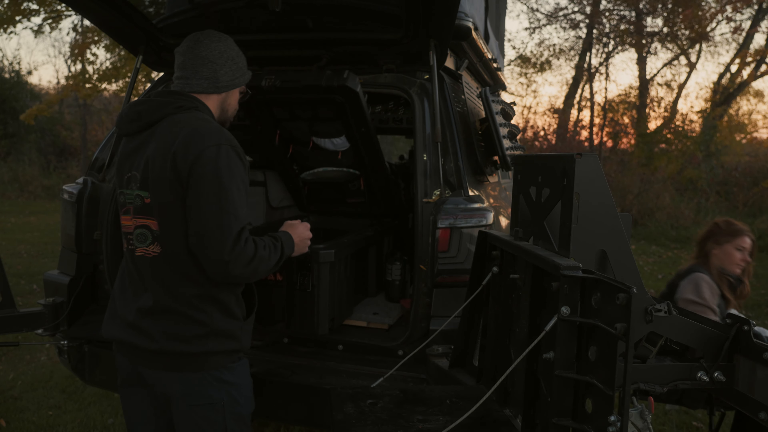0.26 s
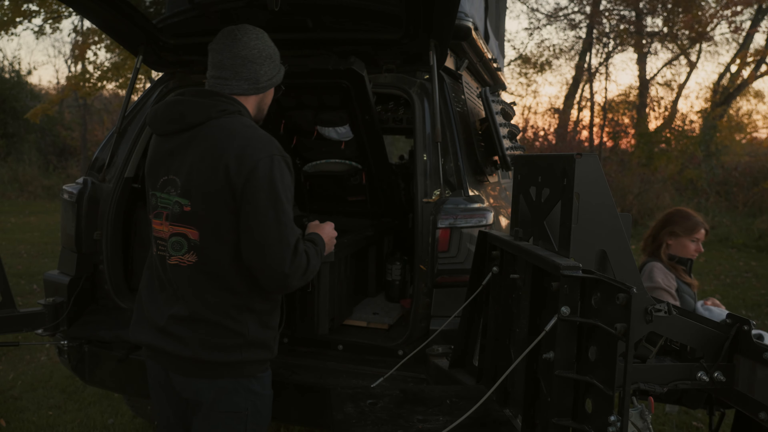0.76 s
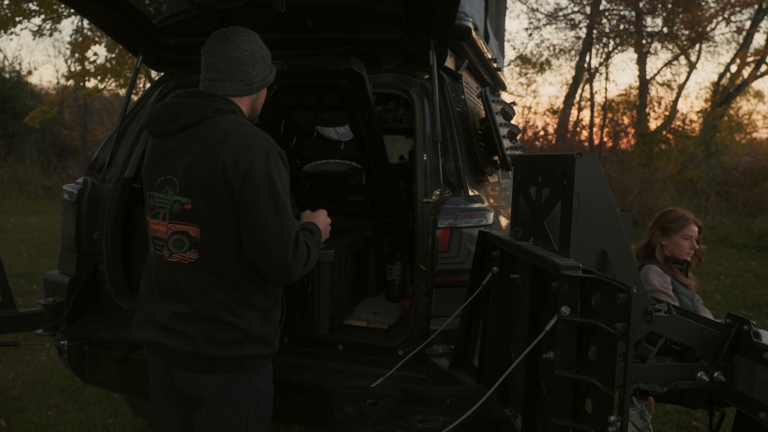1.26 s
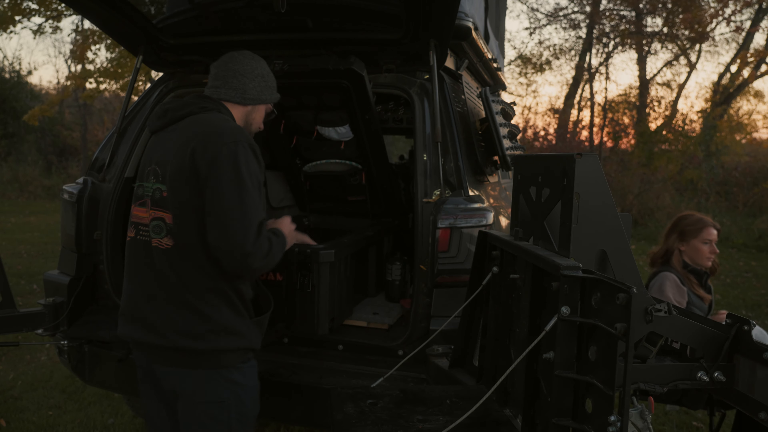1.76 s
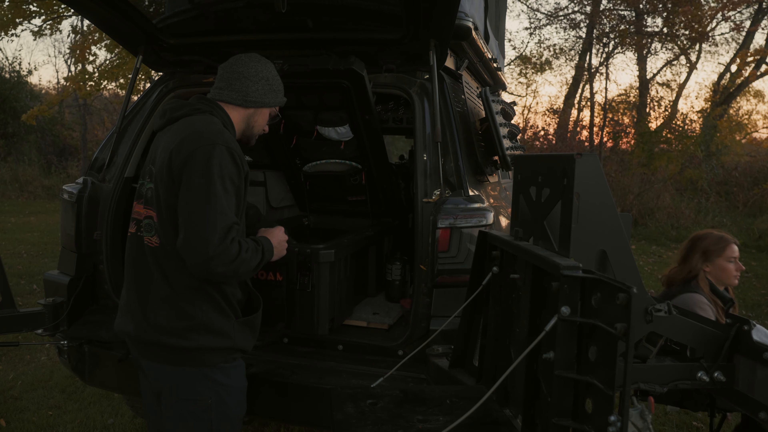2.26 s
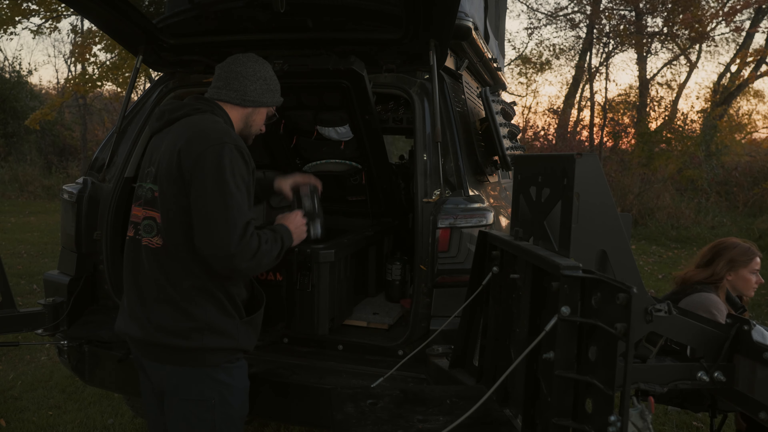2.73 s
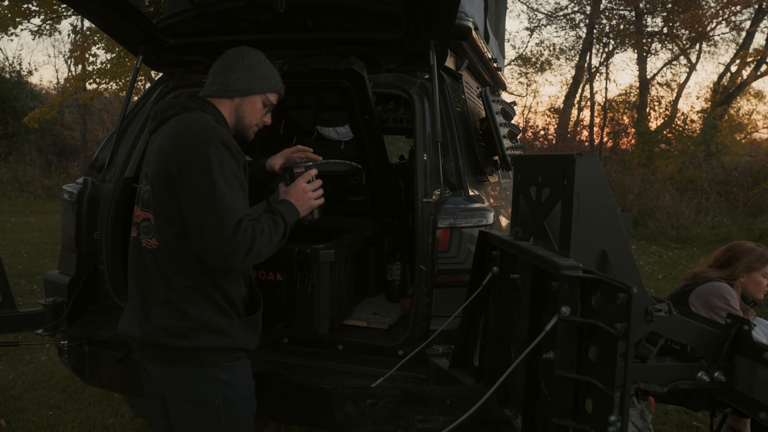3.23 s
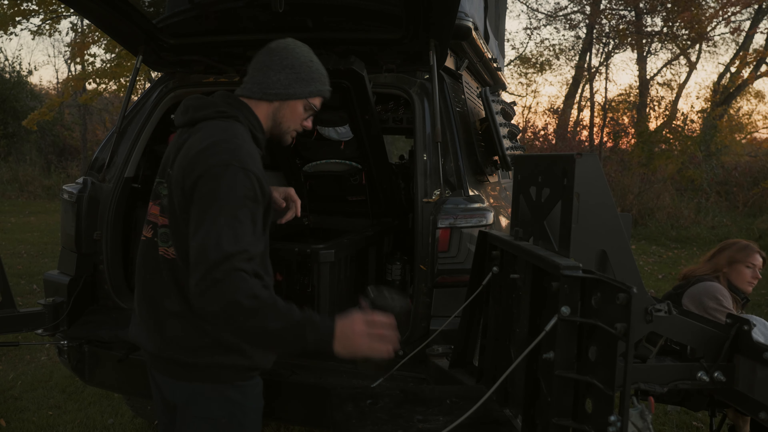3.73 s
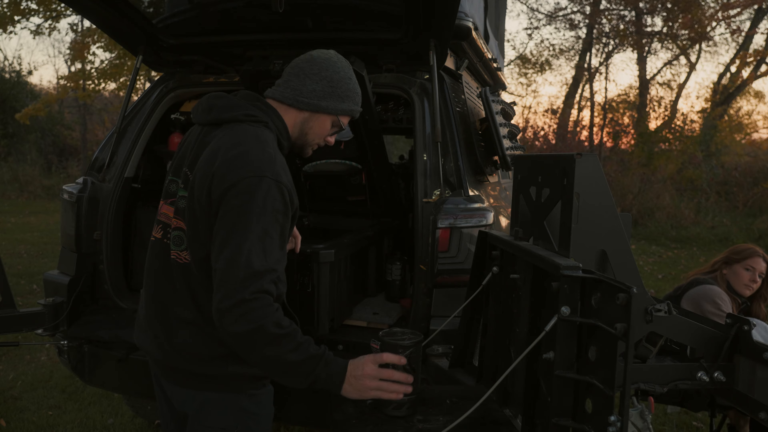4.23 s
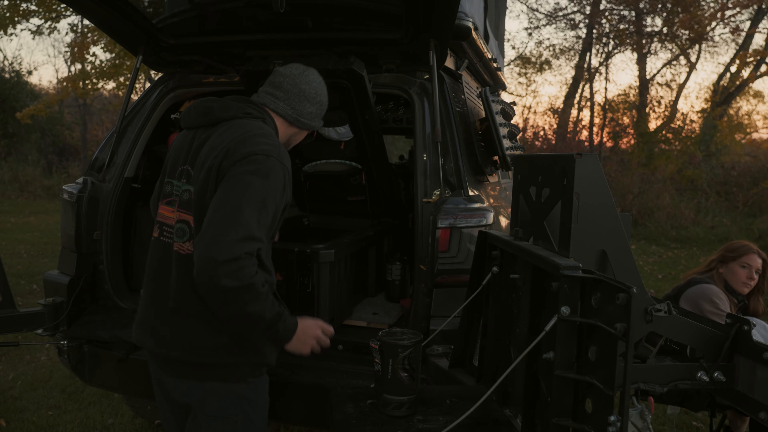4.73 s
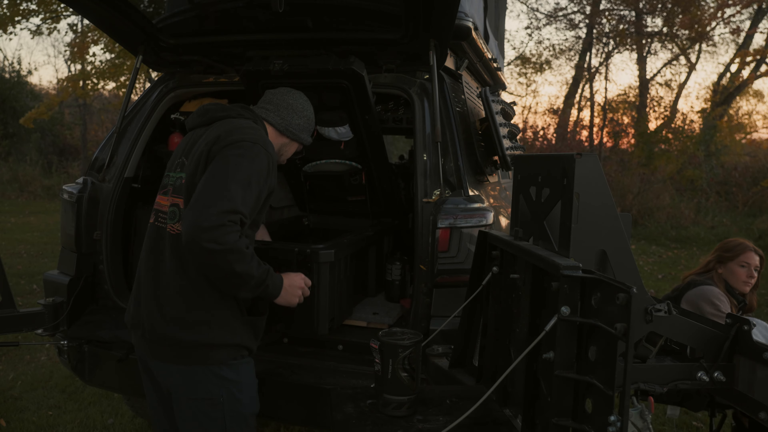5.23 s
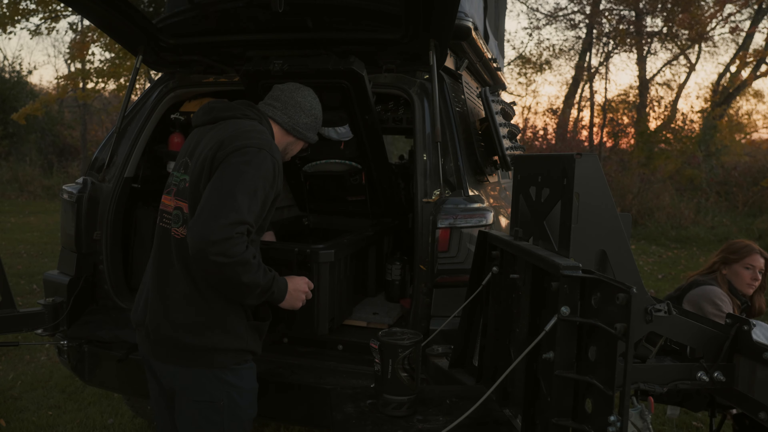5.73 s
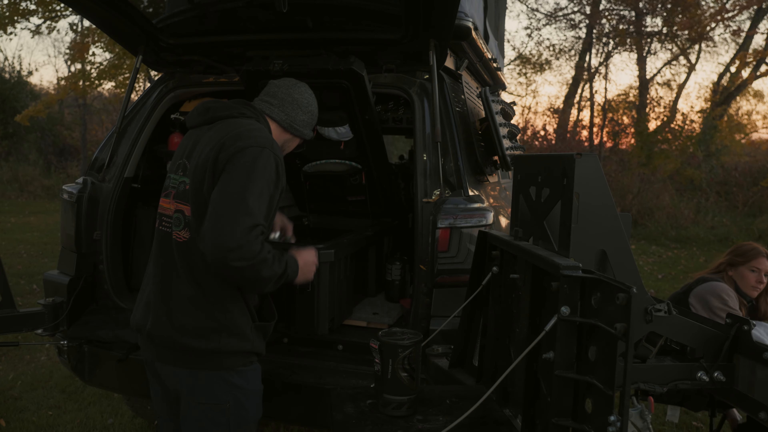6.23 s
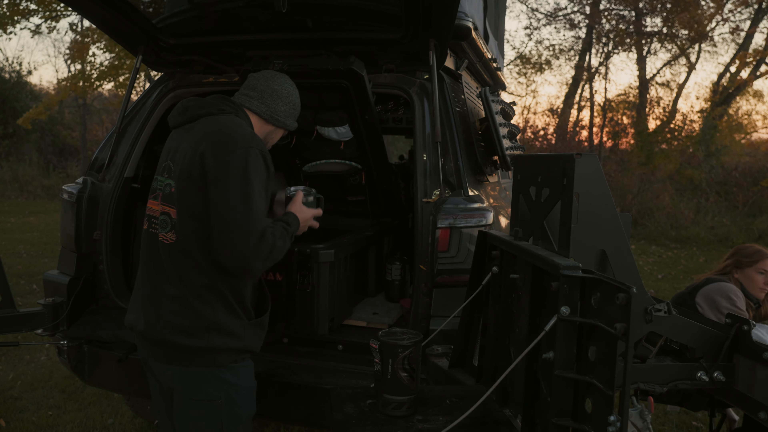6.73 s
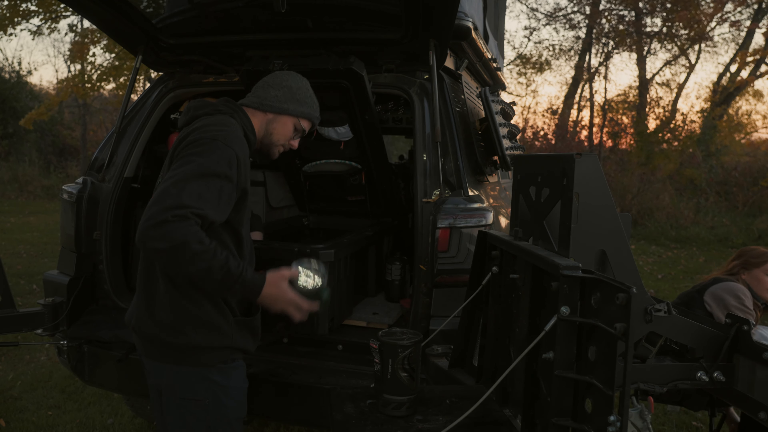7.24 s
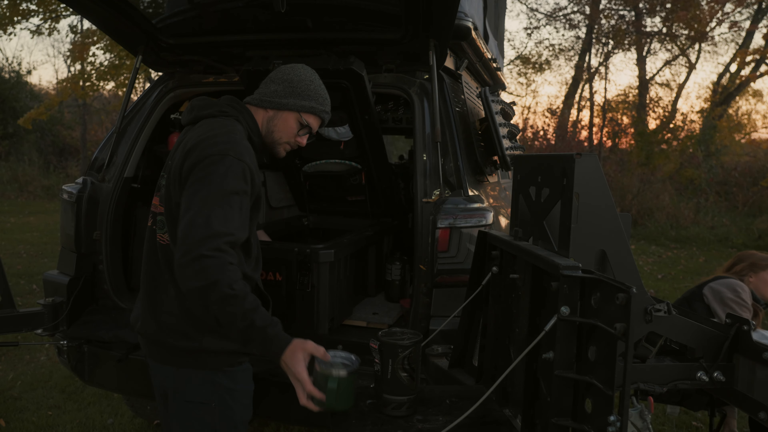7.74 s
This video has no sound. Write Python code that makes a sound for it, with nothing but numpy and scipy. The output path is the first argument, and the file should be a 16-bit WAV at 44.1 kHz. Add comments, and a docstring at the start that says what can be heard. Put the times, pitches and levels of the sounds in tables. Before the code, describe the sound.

Camp cookware knocks and clacks in a plastic bin, a lid clicks onto a pot, the pot lands on a tailgate, then a canister taps.

```python
"""Camp cookware knocks in a plastic bin at the back of a truck: struck walls flex, panels clack, items crack.
Lids and utensils click as a lid snaps on a pot; the pot rings as it is set down on the tailgate.
A fuel canister is stroked and tapped; sleeves and gear rub as shaped noise, and stick-slip tones squeak.
Impacts are sums of decaying modes and noise bursts. Short dull reflections follow all the gear,
over an open-air hush of noise and a faint steady hum of slightly wavering sines."""
import sys
import numpy as np
from scipy import signal
from scipy.fft import rfft, irfft, next_fast_len
from scipy.io import wavfile
from scipy.ndimage import uniform_filter1d

SR = 44100
rng = np.random.default_rng(int(sys.argv[2]) if len(sys.argv) > 2 else 0)


def wav_record(signal):
    """Record a signal, one row per channel, as 16-bit PCM in the file named by sys.argv[1]."""
    frames = np.transpose(np.atleast_2d(signal))
    bounded = np.clip(frames, -1, 1)
    # unit amplitude maps onto the largest positive 16-bit level
    quanta = np.round(bounded * 32767).astype(np.int16)
    wavfile.write(sys.argv[1], SR, quanta)


N = 352359   # length of the scene in samples
HIT_SIZE = SR // 2   # a blow is computed for half a second
AGE = np.arange(HIT_SIZE) / SR   # time since the blow began, s


# Gear knocking in the bin; bin_knocks() offsets each level column:
# [t/s, thump level/dB, thump f/Hz, clack level/dB, crack level/dB]
KNOCKS = [(0.24, -54, 103, -50, -50), (0.589, -41, 138, -66, -61), (0.624, -41, 87.5, -55, -47),
          (0.851, -26, 218, -33, -36), (0.87, -26.5, 95, -70, -56), (1.895, -41, 102, -60, -66),
          (1.931, -31, 137, -43, -62), (1.982, -31, 123, -39, -56), (2.004, -52, 99, -54, -40.5),
          (2.123, -35, 159, -22, -35.5), (2.131, -21.5, 145.4, -35.5, -41), (2.14, -27, 313, -25.5, -36.5),
          (2.155, -24, 142, -53, -63), (2.29, -44, 110, -43.5, -44), (2.302, -28, 88, -51, -70),
          (2.345, -17.5, 140, -30.5, -38), (2.459, -46, 108, -39, -49), (2.496, -26, 150, -40, -51),
          (2.521, -57, 164, -43.5, -42), (2.681, -40.5, 100, -49, -50), (2.741, -41, 214, -53, -56),
          (5.434, -40.5, 128, -61, -53), (5.839, -32.5, 121, -74, -74), (5.898, -29.5, 131, -66, -54),
          (6.09, -15, 180, -19.5, -31.5), (6.104, -16.5, 203, -47, -37), (6.14, -23.5, 103, -37, -47),
          (6.424, -37, 130, -65, -58), (6.437, -38, 115, -40.5, -56.5), (6.656, -39, 231, -59, -70),
          (6.742, -38.5, 264, -64, -69), (7.023, -33, 182, -36.5, -42), (7.041, -36.5, 246, -38, -54),
          (7.164, -35, 130, -52, -68), (7.188, -40.5, 91, -61, -50.5), (7.95, -49, 105, -37, -47.5),
          (7.959, -30.5, 97, -41, -50)]
# Modes of the bin panels, levels relative: [f/Hz, level/dB, t60/s]
BIN_MODES = [(277.6, 2, 0.15), (360.7, 1, 0.2), (399, 0.5, 0.17), (445, -2, 0.1), (516.6, 4, 0.1),
             (565, -1, 0.12), (647, 7, 0.065), (736, 1, 0.074), (813, -5, 0.12), (903, -13.5, 0.093),
             (1021, -7.5, 0.037), (1125, -9, 0.065), (1231, -13, 0.036), (1430, -18.5, 0.03)]
# Boom resonances of the hollow bin: [f/Hz, width/Hz, level/dB]
HOLLOW = [(77.8, 12, -1), (124, 14, -4.5), (154.7, 7.1, -12), (214.4, 37, -4)]
# Spectrum of a cracking item, relative: [f/Hz, level/dB per Hz]
CRACK = [(300, 11), (700, 3.5), (1200, 4.5), (1700, 0.5), (2600, -3), (3800, -8.5), (6000, -23.5),
         (10000, -32), (16000, -36)]
ITEM_HZ, ITEM_SPREAD = 1130, 0.16   # centre pitch of the items; spread in octaves


def bin_knocks(thump_db=-6.0, clack_db=-3.0, crack_db=-0.5, flex_t60=0.058, rise_s=0.004,
               upper_ratio=1.593, upper_db=-10.0, item_db=4.0):
    """Modal impact: the wall flexes and excites the hollow, panels clack and the item cracks at its own pitch."""
    thumps, rest = np.zeros((2, N))
    for s, low_db, hz, mid_db, high_db in KNOCKS:
        phase = 2 * np.pi * hz * AGE
        two_modes = np.sin(phase) + from_db(upper_db) * np.sin(upper_ratio * phase)
        flex = two_modes * fade(flex_t60) * (1 - np.exp(-AGE / rise_s))
        add(thumps, s, at_level(flex, low_db + thump_db))

        # a soft contact leaves the upper panel modes quiet
        hardness_db = 0.46 * (high_db - mid_db + 12.0)
        clack = ring(BIN_MODES, scatter_db=4.5, detune=0.016, tilt_db=hardness_db)
        add(rest, s, at_level(clack, mid_db + clack_db))

        crack = burst(CRACK, t60=0.055, tail_db=-12, tail_t60=0.1, ripple_db=3.0)
        item_hz = ITEM_HZ * 2 ** (ITEM_SPREAD * rng.standard_normal())
        item = resonance(crack, item_hz, 180)
        add(rest, s, at_level(crack + from_db(item_db) * item, high_db + crack_db))
    boom = sum(from_db(db) * resonance(thumps, hz, width) for hz, width, db in HOLLOW)
    return thumps + rest + boom


# A loose metal item set ringing inside the bin: [t/s, level/dB, f/Hz]
CLINKS = [(0.626, -55, 1780), (0.852, -40.5, 1238), (2.141, -34, 920), (5.435, -60, 1127),
          (6.092, -28.5, 1115)]


def clinks(t60=0.043, twin_ratio=1.09, twin_db=-8.0):
    """Damped close modes: a metal item rings at two near pitches, soon damped by the gear around it."""
    out = np.zeros(N)
    for s, db, hz in CLINKS:
        modes = [(hz, 0, t60), (hz * twin_ratio, twin_db, t60 / 2)]
        add(out, s, at_level(ring(modes), db))
    return out


# Small hard contacts of lids and utensils; utensil_clicks() offsets both level columns:
# [t/s, click level/dB, edge level/dB, ring f/Hz]
CLICKS = [(2.038, -44, -74, 3330), (2.1042, -30, -77, 3250), (2.1318, -25.5, -39, 2040),
          (2.167, -36, -57, 3770), (2.175, -29, -34, 3250), (2.1998, -40, -64, 3150),
          (2.476, -29.5, -62, 3230), (2.5428, -36.5, -54, 3100), (2.5585, -30, -56, 3280),
          (2.6123, -37.5, -70, 2890), (2.6444, -31, -55, 2950), (2.9798, -46, -78, 1900),
          (3.0772, -44, -62, 2920), (3.129, -42, -42, 4100), (3.1394, -30.5, -28, 3460),
          (3.1522, -37.5, -45, 3200), (3.2909, -53, -53, 3940), (3.5936, -45, -58, 2720),
          (3.628, -41, -59, 2620), (4.045, -29, -56, 2260), (4.074, -29.5, -52, 4200),
          (4.123, -41, -65, 2320), (4.1418, -39.5, -51, 3460), (4.1583, -34.5, -47, 4460),
          (4.1718, -39, -48, 3520), (4.4047, -46.5, -51, 2330), (7.023, -37, -58, 1750),
          (7.0472, -42, -70, 2120), (7.1524, -43, -71, 4150), (7.4909, -44, -62, 2650),
          (7.7127, -31, -27, 4260)]
# Spectrum of a click, also used for canister ticks, relative: [f/Hz, level/dB per Hz]
CLICK = [(150, -12), (500, 12.5), (1400, -1), (2200, -2.5), (3200, -2), (4500, -1), (6500, -7.5),
         (9000, -14), (16000, -35)]
# Spectrum of a bright edge, also used for fine hiss, relative: [f/Hz, level/dB per Hz]
EDGE = [(2000, -40), (5000, -4), (7500, -2.5), (10000, -2.5), (13000, -4), (16000, -0.5)]


def utensil_clicks(click_db=-9.0, edge_db=-7.0, ring_db=7.0, ring_width_hz=340.0,
                   low_cut_hz=1260.0, octaves_per_db=0.09):
    """Contact hardness: light parts click and ring with a bright edge; the harder the edge, the thinner the click."""
    out = np.zeros(N)
    for s, body_db, top_db, hz in CLICKS:
        cut_hz = np.clip(low_cut_hz * 2 ** (octaves_per_db * (top_db - body_db)), 100, 3000)
        high_pass = signal.butter(2, cut_hz, "high", fs=SR, output="sos")
        click = signal.sosfilt(high_pass, burst(CLICK, t60=0.046, tail_db=-8.5, tail_t60=0.053))
        ringing = from_db(ring_db) * resonance(click, hz, ring_width_hz)
        add(out, s, at_level(click + ringing, body_db + click_db))
        edge = burst(EDGE, t60=0.03, tail_db=-24, tail_t60=0.086)
        add(out, s, at_level(edge, top_db + edge_db))
    return out


# The pot landing and rocking on the tailgate: [t/s, level/dB]
SET_DOWN = [(4.047, -27), (4.076, -42.5), (4.122, -49.5), (4.271, -50.5)]
# Modes of the pot and the tailgate under it, levels relative: [f/Hz, level/dB, t60/s]
POT_MODES = [(80, -9, 0.83), (158, -9, 0.77), (212.4, -5, 0.48), (238.4, -2, 0.39), (271.4, -3, 0.41),
             (310, -6.5, 0.56), (359, 7, 0.23), (390.5, 1.5, 0.21), (460, -12, 0.49), (785, -4.5, 0.16),
             (846, -7, 0.79), (892, -2, 0.078), (1238, -22, 0.82), (1570, -22.5, 0.92), (1730, -1, 0.032),
             (2280, -15.5, 0.42), (2331, -19, 0.29), (3230, -19, 0.33), (4230, -22, .25)]
# Spectrum of the tailgate thud, relative: [f/Hz, level/dB per Hz]
TAILGATE = [(50, -25), (120, -10), (300, -5), (500, -4.5), (700, -16), (1100, -26), (2500, -16.5),
            (8000, -38.5)]


def pot(thud_db=-4.5):
    """Coupled modes: the pot lands on its rim and rocks flat, ringing over the thud of the tailgate."""
    out, note = np.zeros(N), ring(POT_MODES)
    for s, db in SET_DOWN:
        thud = burst(TAILGATE, t60=0.06, tail_db=-13, tail_t60=0.33, ripple_db=2.0)
        add(out, s, at_level(note, db) + at_level(thud, db + thud_db))
    return out


# Taps on the canister: [t/s, level/dB]
TAPS = [(7.492, -52), (7.713, -33.5)]
# Modes of the hand-held canister, levels relative: [f/Hz, level/dB, t60/s]
CANISTER_MODES = [(410, 2, 0.087), (624, -9, 0.11), (1076, 6.5, 0.034), (1214, 4, 0.2), (1660, -1.5, 0.042),
                  (3030, -4, 0.052), (3540, 9, 0.02), (3800, -3, 0.033), (4300, 9.5, 0.019),
                  (5500, -23, 0.29), (7660, -19, 0.25), (9500, -6, 0.019), (10400, -8, .04),
                  (11000, 4, 0.016)]


def canister(tick_db=-19.0):
    """Damping by the hand: most of the tapped modes die at once and a few ring on, under a sharp metal tick."""
    out, note = np.zeros(N), ring(CANISTER_MODES)
    for s, db in TAPS:
        add(out, s, at_level(note, db))
        tick = burst(CLICK, t60=0.03, tail_db=-23, tail_t60=0.076)
        add(out, s, at_level(tick, db + tick_db))
    return out


# Fingers stroking the canister: [t/s at the fastest, speeding up/s, slowing down/s, level/dB]
STROKES = [(5.69, .03, 0.038, -62), (5.82, .05, 0.042, -54.5), (6.05, 0.09, 0.11, -63),
           (6.75, .1, .06, -67), (7.125, .025, 0.054, -66.5), (7.25, 0.026, 0.21, -58.5),
           (7.335, 0.1, 0.27, -64.5), (7.57, 0.078, 0.05, -64)]
# Resonances of the rubbed canister shell, levels relative: [f/Hz, width/Hz, level/dB]
SHELL = [(1170, 89, -0.5), (2560, 90, -3), (3440, 70, -6), (4380, 260, 1.5), (7130, 170, -2),
         (8670, 320, 0.5), (10760, 220, -1), (11600, 520, -1), (13300, 900, -1), (15300, 1300, -2)]


def grip(grain_db=-1.5, flutter_db=4.5, skin_db=-27.0):
    """Friction excitation: skin drags over the canister in tiny slips that set its thin shell hissing."""
    pressure, = strokes(STROKES)
    unevenness_db = grain_db * drift(980) + flutter_db * drift(80)
    slips = rng.standard_normal(N) * from_db(unevenness_db)
    shell = sum(from_db(db) * resonance(slips, hz, width) for hz, width, db in SHELL)
    skin = from_db(skin_db) * np.diff(slips, prepend=0)
    return pressure * rms_one(shell + skin)


# Smooth surfaces sticking and slipping; the glide is a share of the pitch each side of the middle:
# [t/s at the middle, half-length/s, f/Hz, level/dB, glide]
SQUEAKS = [(0.231, 0.031, 12580, -37.5, -0.0021), (0.256, 0.05, 8300, -57, -0.061),
           (0.249, 0.034, 4320, -58.5, -0.034), (0.875, 0.011, 4850, -54, -0.047),
           (0.95, 0.016, 5100, -61.5, 0.0), (2.178, 0.039, 10800, -57, -0.021),
           (3.653, 0.041, 10940, -63, 0.0), (4.41, 0.036, 2273, -60, 0.014),
           (5.701, 0.094, 3520, -61.5, 0.022), (5.994, .02, 1630, -60, 0.014),
           (6.038, 0.054, 1113, -58, 0.0062), (6.659, 0.044, 832, -60.5, -0.03),
           (6.675, 0.079, 3740, -58, -0.017), (7.245, 0.045, 4320, -63, -0.0046)]


def squeaks(waver_hz=75.0, catch_db=2.5):
    """Stick-slip oscillation: brief tones swell and die, with an unsteady pitch and a catching level."""
    out = np.zeros(N)
    for s, half_length, hz, db, glide in SQUEAKS:
        along = AGE / half_length - 1   # -1 at the start, 0 at the middle
        waver = waver_hz * np.sqrt(hz / 4000) * drift(557, size=HIT_SIZE)   # waver_hz holds at 4 kHz
        pitch = hz * (1 + glide * np.clip(along, -1, 1)) + waver
        swell = np.exp(-8 * along ** 2) * from_db(catch_db * drift(303, size=HIT_SIZE))
        tone = np.sqrt(2) * np.sin(2 * np.pi * np.cumsum(pitch) / SR)
        add(out, s - half_length, from_db(db) * swell * tone)
    return out


# Sleeves and gear sliding, one row a stroke:
# [t/s at the fastest, speeding up/s, slowing down/s, rubbing level/dB, fine hiss level/dB]
SLIDES = [(.27, 0.046, .045, -62, -58.5), (1.93, 0.068, 0.27, -62, -68), (2.13, 0.074, 0.04, -52, -79),
          (2.51, 0.36, 0.32, -61.5, -61.5), (2.88, 0.13, .025, -79, -66), (3.065, 0.031, 0.06, -61, -57),
          (3.12, .05, .06, -66.5, -52), (3.3, .09, .035, -68, -62), (4.45, 0.19, .03, -70, -65),
          (5.5, 0.29, 0.18, -63, -66.5), (5.685, 0.017, 0.033, -61.5, -54.5), (5.82, .05, 0.043, -64, -56),
          (5.89, 0.11, 0.14, -58.5, -64), (6.66, 0.05, 0.036, -64.5, -59),
          (6.745, 0.055, 0.041, -67.5, -64), (7.45, 0.36, 0.44, -69, -68)]
# Heavy gear shifting on the bin floor:
# [t/s at the fastest, speeding up/s, slowing down/s, rumble level/dB]
DRAGS = [(2.17, 0.098, 0.057, -35.5), (2.54, .1, 0.23, -51), (5.48, 0.073, 0.21, -50),
         (5.9, 0.51, 0.2, -52), (6.11, .02, 0.1, -36.5), (6.8, 0.62, 0.54, -60), (7.15, 0.24, 0.19, -52)]
# Spectrum of rubbing, relative: [f/Hz, level/dB per Hz]
RUBBING = [(150, -28), (600, 6), (1800, -4), (4000, 0), (7000, -13), (16000, -40)]
# Spectrum of the bin's rumble, relative: [f/Hz, level/dB per Hz]
RUMBLE = [(25, -32), (60, -3), (110, 3.5), (170, -1.5), (260, -2.5), (450, -20.5), (1000, -46), (3000, -50)]


def handling(grain_db=2.5, flutter_db=2.0):
    """Friction noise: sliding surfaces catch in tiny uneven grains; heavy gear makes the bin rumble."""
    rub_gain, hiss_gain = strokes(SLIDES)
    drag_gain, = strokes(DRAGS)
    unevenness_db = grain_db * drift(1500) + flutter_db * drift(70)
    grains = rng.standard_normal((2, N)) * from_db(unevenness_db)
    rubbing = rub_gain * colour(grains[0], RUBBING)
    hiss = hiss_gain * colour(grains[1], EDGE)
    rumble = np.hypot(drag_gain, settling()) * noise(RUMBLE)   # the two powers add
    return rubbing + hiss + rattles(rub_gain) + rumble


def rattles(rub_gain, above_db=0.0, spread_db=3.0, count=380):
    """Random micro-impacts: sliding gear catches in ticks of chance time and pitch that follow the rubbing level."""
    out, decay = np.zeros(N), fade(0.04)[:HIT_SIZE // 10]
    for when, pitch, strength in rng.random((count, 3)):
        tick_hz = 900 * 11 ** pitch
        tick = resonance(rng.standard_normal(len(decay)) * decay, tick_hz, 550)
        tick_db = above_db + spread_db * (2 * strength - 1)
        add(out, when * N / SR, rub_gain[int(when * N)] * at_level(tick, tick_db))
    return out


SETTLE_DB, SETTLE_T60_S = -21, 0.35   # rumble relative to the tabled thump level; its decay


def settling():
    """Energy decay: every knock shakes the load, which soon comes to rest; a gain curve from summed powers."""
    power = np.zeros(N)
    for s, thump_db, *_ in KNOCKS:
        gain = from_db(thump_db + SETTLE_DB) * fade(SETTLE_T60_S)
        add(power, s, gain ** 2)
    return np.sqrt(power)


STROKE_END_DB, STROKE_ROUNDNESS = -15.5, 1.6   # level at both ends; 1 is a pointed swell, 2 a round one


def strokes(rows):
    """Speed-dependent friction: strokes swell as the hand speeds up and die as it slows; a gain per level column."""
    t, power = np.arange(0, N, 20) / SR, 0
    for s, rise, fall, *levels in rows:
        away = np.maximum((s - t) / rise, (t - s) / fall)   # 0 at the fastest, 1 at either end
        shape_db = STROKE_END_DB * np.minimum(away, 10) ** STROKE_ROUNDNESS
        power = power + from_db(np.array(levels)[:, None] + shape_db) ** 2
    return [np.interp(np.arange(N) / SR, t, np.sqrt(p)) for p in power]


def cargo_bay(x, wet_db=-16.5, t60=0.15, delay_s=0.014):
    """Diffuse reflection: decaying noise, convolved in, gives short dull echoes of the open back of the truck."""
    walls = [(40, 6.5), (300, -4.0), (1200, -1), (4000, -6.5), (16000, -13)]   # f/Hz, level/dB per Hz
    onset = np.clip(AGE / delay_s - 1, 0, 1)   # silent until delay_s, full at twice that
    echoes = noise(walls, size=HIT_SIZE) * fade(t60) * onset
    in_band = np.abs(rfft(echoes))[:HIT_SIZE // 20]   # unit mean power gain below 2.2 kHz
    unit_echoes = echoes / np.sqrt(np.mean(in_band ** 2))
    return from_db(wet_db) * signal.fftconvolve(x, unit_echoes)[:N]


# Components of the hum: [f/Hz, level/dB]
HUM = [(102.3, -71.5), (133, -82), (183, -72.5), (233, -62.5), (354, -73.5), (466, -77), (540, -75),
       (1163, -82)]
# Spectrum of the open air, relative: [f/Hz, level/dB per Hz]
AIR = [(20, -1.5), (60, 0.5), (100, 2.5), (200, -2), (360, -4.5), (520, -9.5), (780, -13.5), (1150, -13.5),
       (1600, -19.5), (4500, -19.5), (7000, -25), (11000, -30.5), (16000, -33.5)]


def background(air_db=-59.5, waver_hz=1.11, throb_db=1.0):
    """Noise and line spectrum: an open-air hush with the wavering hum of a distant machine."""
    out = from_db(air_db) * noise(AIR)
    for hz, db in HUM:
        phase = 2 * np.pi * np.cumsum(hz + waver_hz * drift(8)) / SR
        out += np.sqrt(2) * from_db(db + throb_db * drift(11.0)) * np.sin(phase)
    return out


def ring(modes, scatter_db=0.0, detune=0.0, tilt_db=0.0):
    """Modal superposition: one blow on a body; scatter varies its modes and tilt raises them in dB an octave."""
    out = np.zeros(HIT_SIZE)
    for k, (hz, db, t60) in enumerate(modes):
        strength, shift = rng.standard_normal(2)
        gain = from_db(db + scatter_db * strength + tilt_db * np.log2(hz))
        tone = np.sin(2 * np.pi * hz * (1 + detune * shift) * AGE)
        out += (-1) ** k * gain * fade(t60) * tone   # neighbouring modes have opposite signs
    return out


def burst(spectrum, t60, tail_db, tail_t60, ripple_db=3.0):
    """High modal density: crowded modes heard as noise, a quick crack and a weaker, longer tail."""
    envelope = fade(t60) + from_db(tail_db) * fade(tail_t60)
    return noise(rippled(spectrum, ripple_db), size=HIT_SIZE) * envelope


def rippled(spectrum, ripple_db, count=90):
    """Modal irregularity: a spectrum with the chance peaks and dips of one particular object."""
    hz, db = np.transpose(spectrum)
    fine_hz = np.geomspace(hz[0], hz[-1], count)
    smooth_db = np.interp(np.log(fine_hz), np.log(hz), db)
    return np.column_stack([fine_hz, smooth_db + ripple_db * rng.standard_normal(count)])


def resonance(x, hz, width_hz):
    """Damped resonator: a two-pole band-pass with gain about 1 at its centre."""
    r = np.exp(-np.pi * width_hz / SR)
    zeros = np.array([1, 0, -1]) * (1 - r * r) / 2
    poles = [1, -2 * r * np.cos(2 * np.pi * hz / SR), r * r]
    return signal.lfilter(zeros, poles, x)


def fade(t60):
    """Exponential decay: the amplitude falls by 60 dB in t60 seconds."""
    return np.exp(-np.log(1000) / t60 * AGE)


def noise(spectrum, size=N):
    """Random excitation: coloured noise with rms 1."""
    return colour(rng.standard_normal(size), spectrum)


def colour(x, spectrum):
    """Spectral shaping: weight a sound by a spectrum read on a log frequency axis; rms 1."""
    hz, db = np.transpose(spectrum)
    size = next_fast_len(len(x))
    bins = np.maximum(np.fft.rfftfreq(size, 1 / SR), 1)
    gain = from_db(np.interp(np.log(bins), np.log(hz), db))
    return rms_one(irfft(rfft(x, size) * gain, size)[:len(x)])


def drift(rate, size=N):
    """Random modulation: straight lines join normal values of spread 1, rate of them a second."""
    knots = rng.standard_normal(size // 20)
    return np.interp(np.arange(size) * rate / SR, np.arange(len(knots)), knots)


def from_db(db):
    """Logarithmic level: decibels to amplitude gain."""
    return np.exp(np.asarray(db) * (np.log(10) / 20))


def rms_one(x):
    """Mean-square normalization: scale to unit rms."""
    return x / np.sqrt(np.mean(x ** 2) + 1e-20)


def at_level(x, db):
    """Short-time level: scale a blow so that its loudest 5 ms have this rms level."""
    loudest_power = uniform_filter1d(x ** 2, size=220, mode="constant").max()
    return x * from_db(db) / np.sqrt(loudest_power + 1e-20)


def add(out, s, sound):
    """Linear superposition: mix a sound in from time s on."""
    start = max(round(s * SR), 0)
    out[start:start + len(sound)] += sound[:N - start]


def scene():
    """Superposition of direct sound, reflections and background: the gear, its echoes and the campsite."""
    gear = bin_knocks() + clinks() + utensil_clicks() + pot() + canister() + grip() + squeaks() + handling()
    return (gear + cargo_bay(gear) + background())[None]


def record(dry):
    """Band limitation: the deepest bass below 42 Hz and the top above 16 kHz are cut."""
    dry = signal.sosfilt(signal.butter(2, 42, "high", fs=SR, output="sos"), dry)
    low_pass = signal.ellip(10, 0.2, 70, 16000, fs=SR, output="sos")
    return signal.sosfilt(low_pass, dry)


dry = scene()
out = record(dry)
wav_record(out)
```